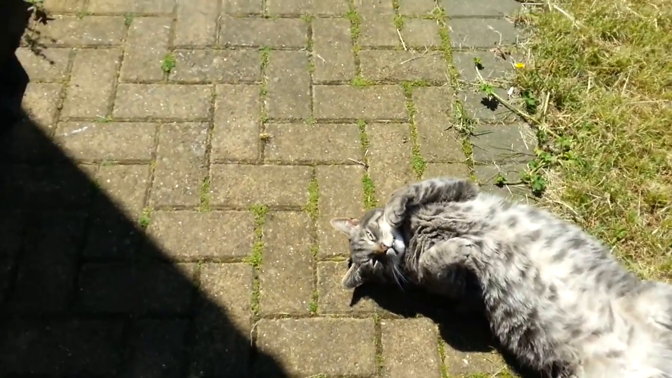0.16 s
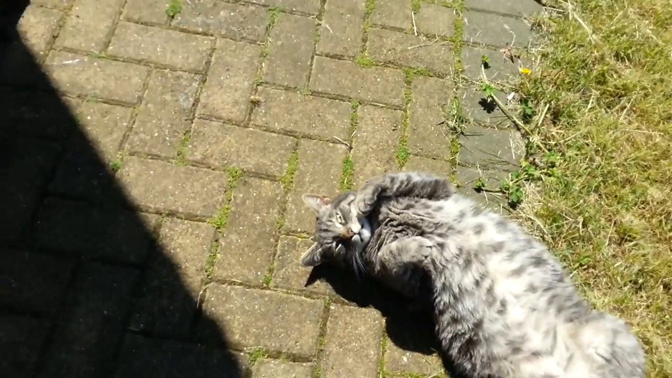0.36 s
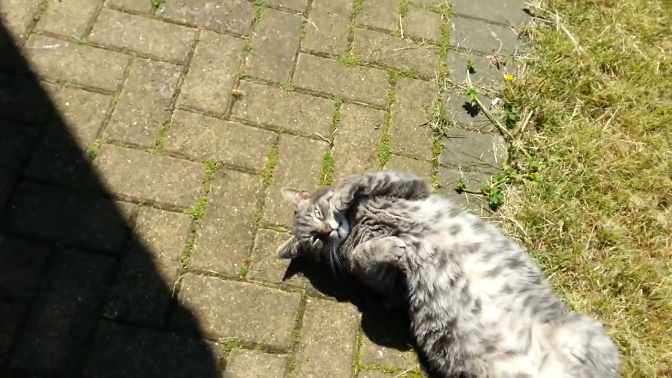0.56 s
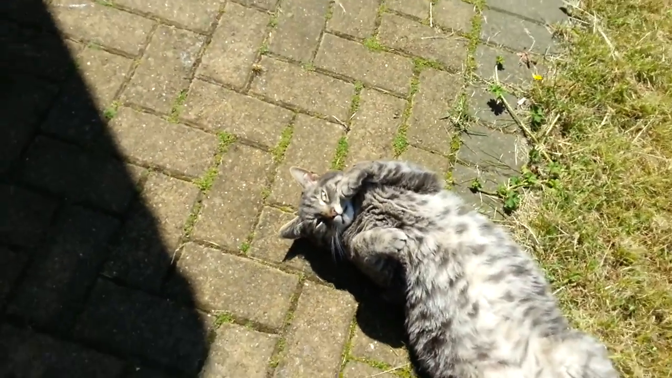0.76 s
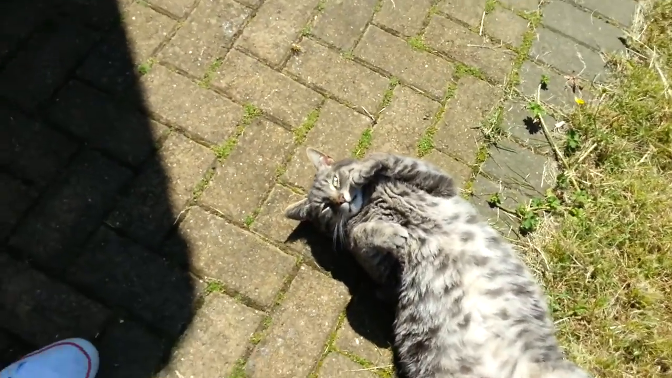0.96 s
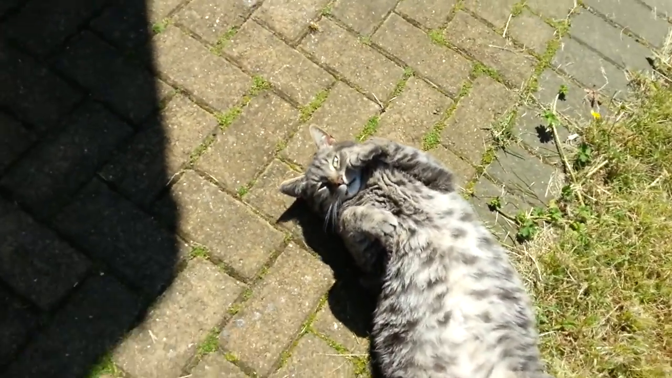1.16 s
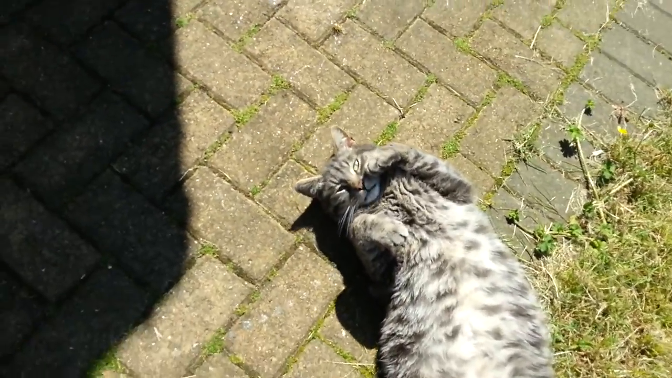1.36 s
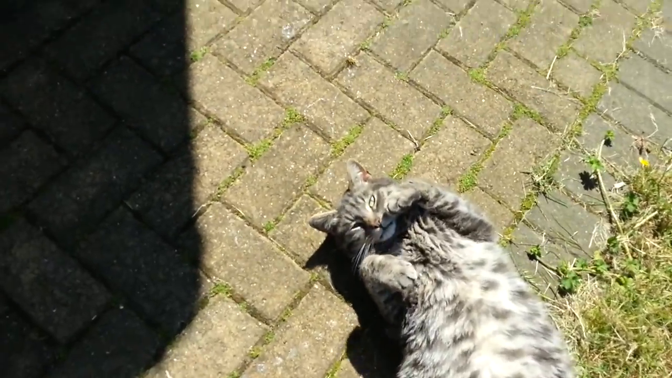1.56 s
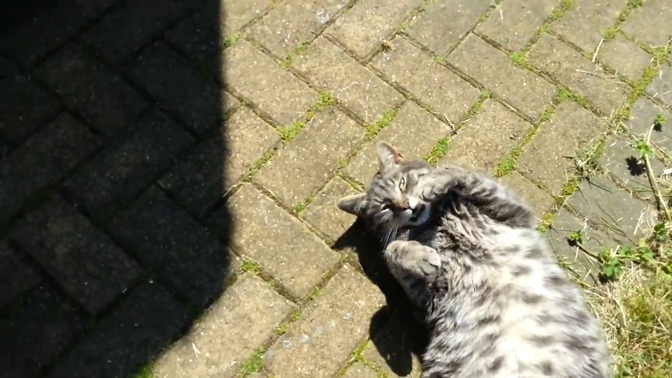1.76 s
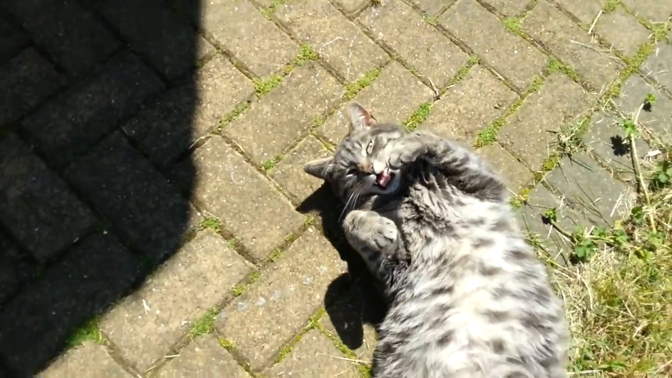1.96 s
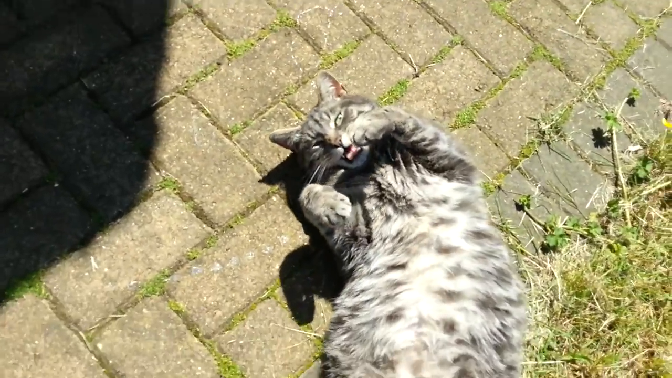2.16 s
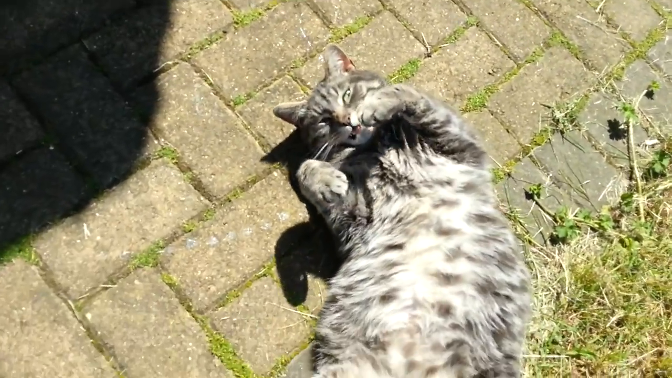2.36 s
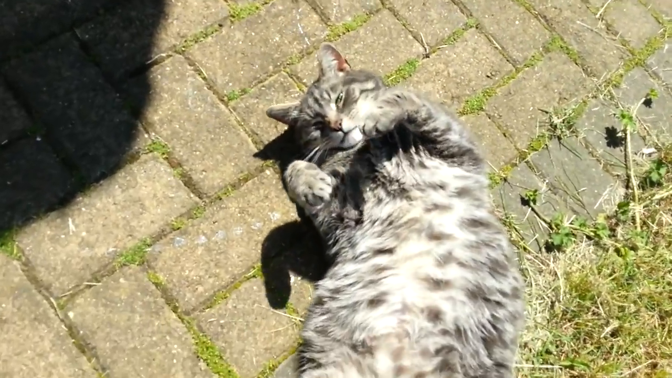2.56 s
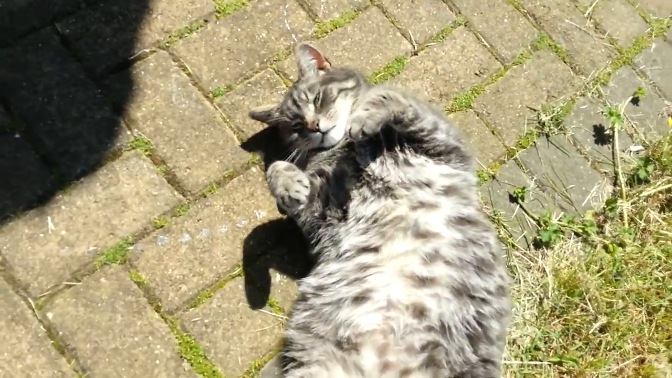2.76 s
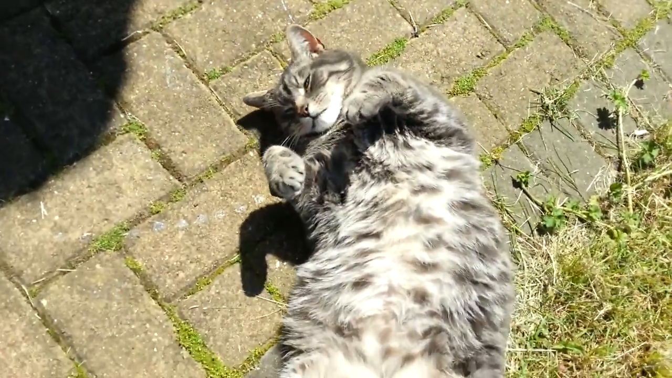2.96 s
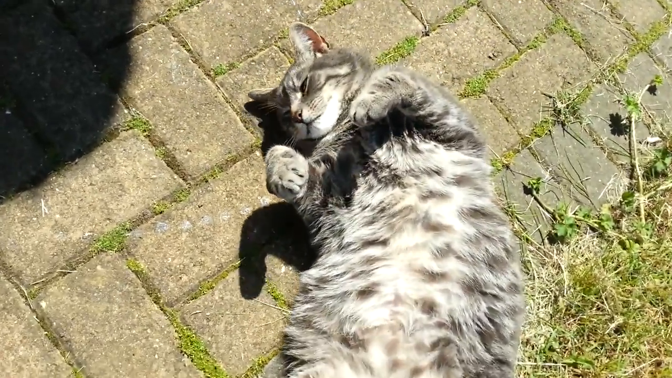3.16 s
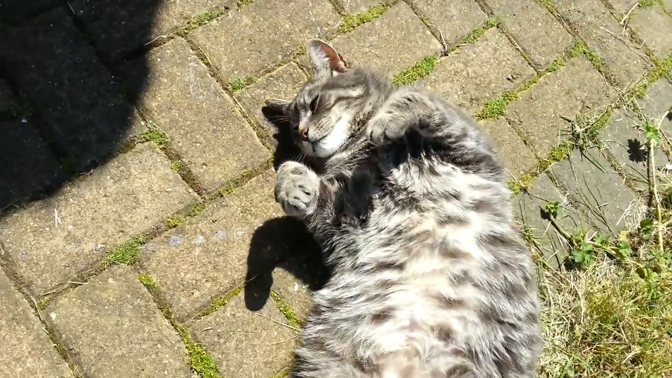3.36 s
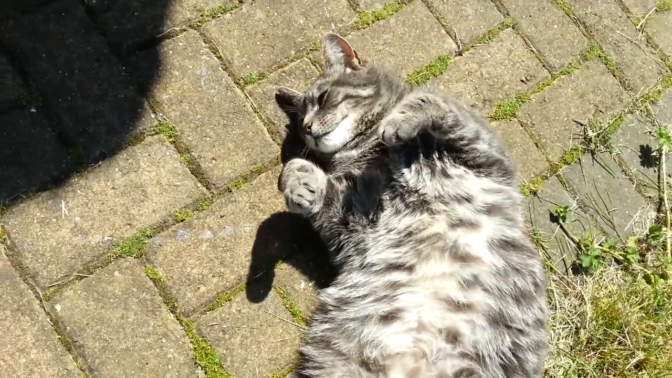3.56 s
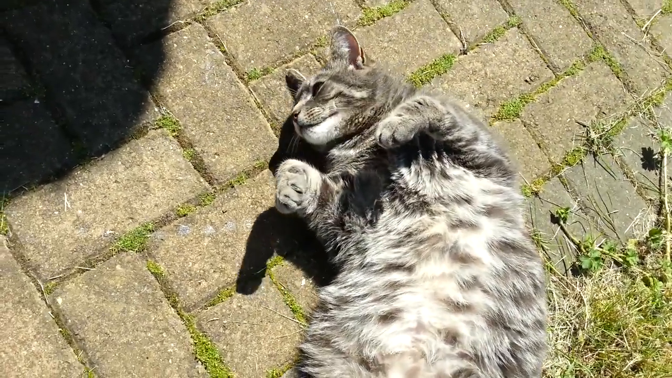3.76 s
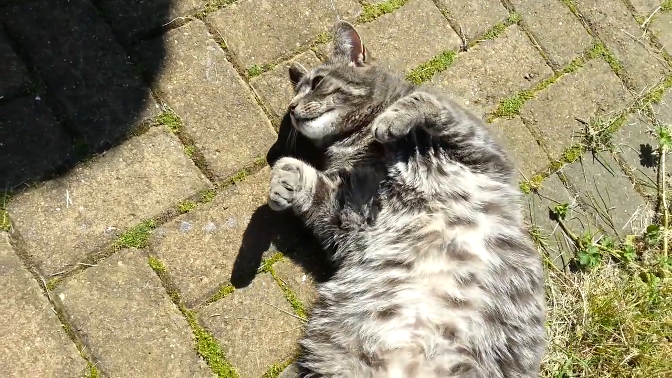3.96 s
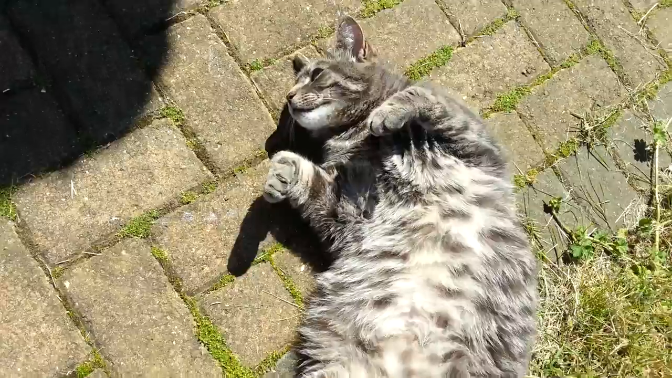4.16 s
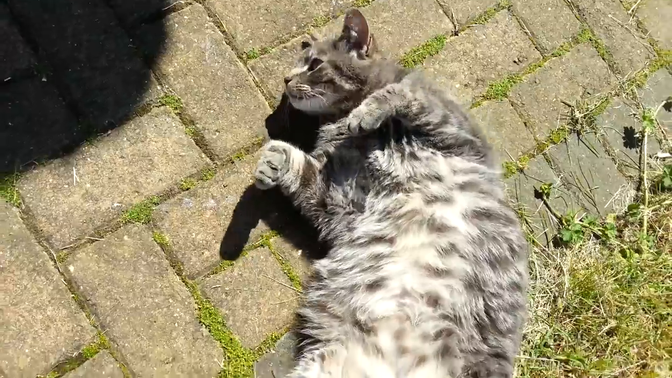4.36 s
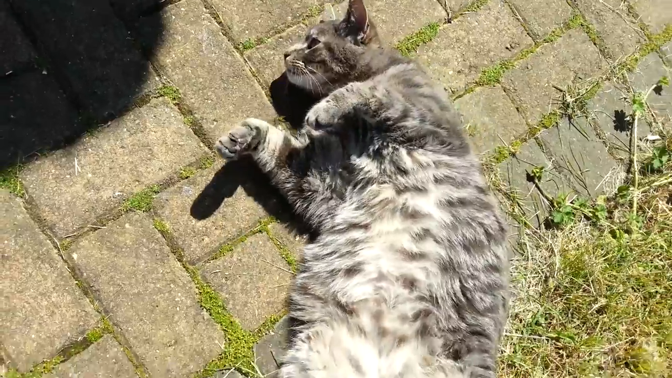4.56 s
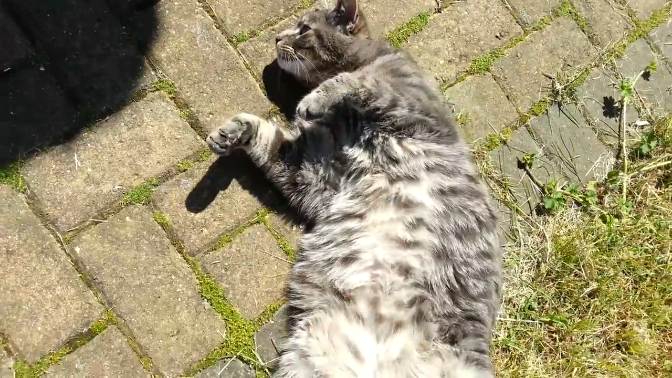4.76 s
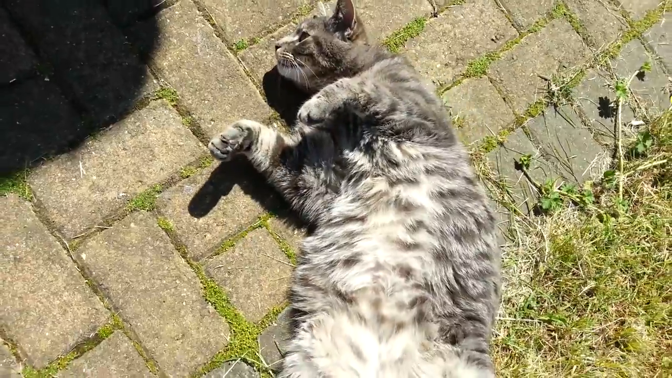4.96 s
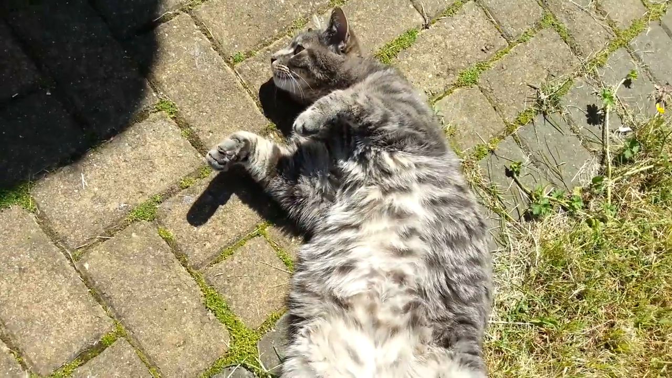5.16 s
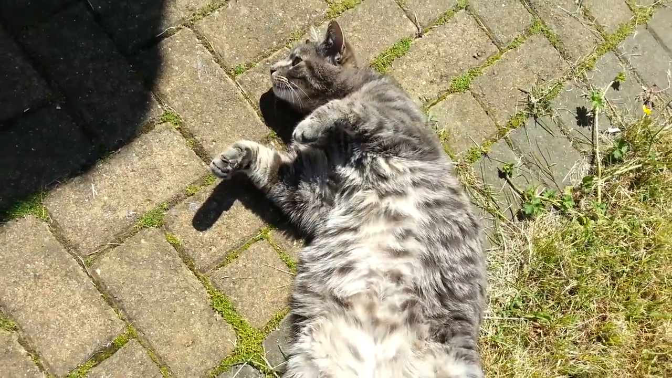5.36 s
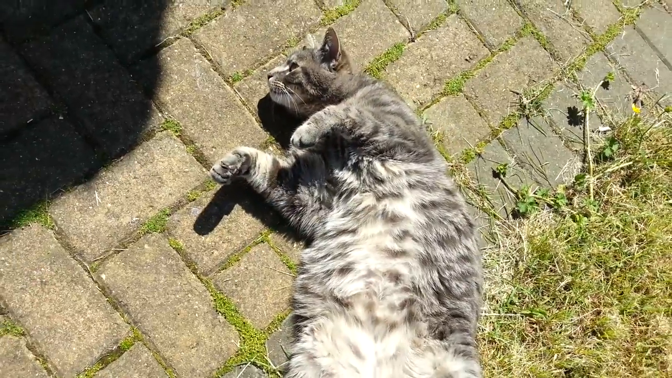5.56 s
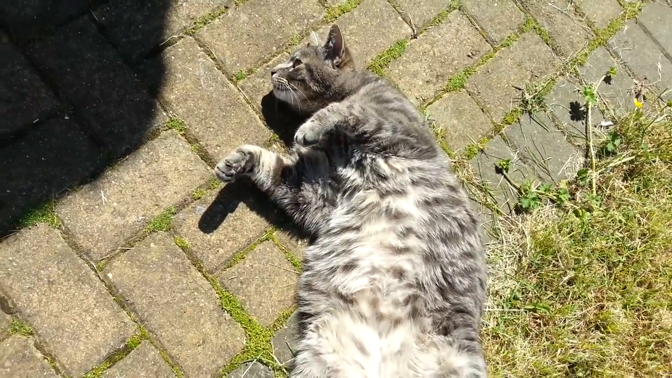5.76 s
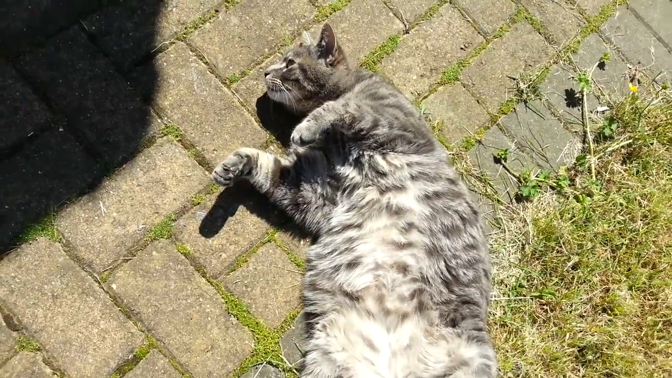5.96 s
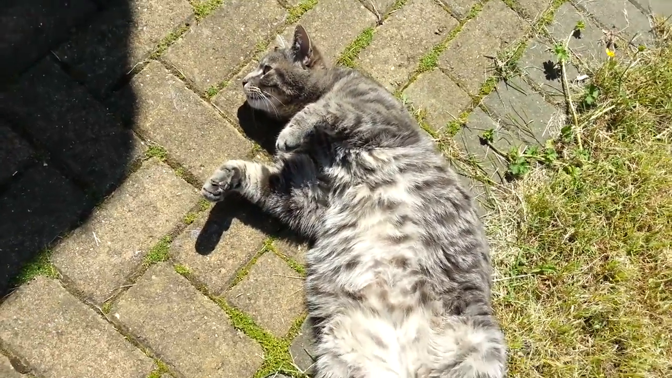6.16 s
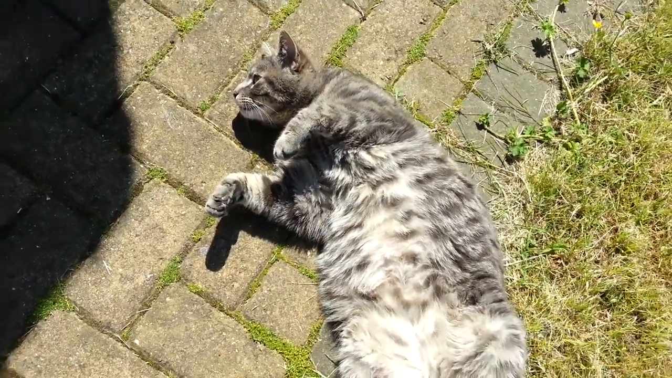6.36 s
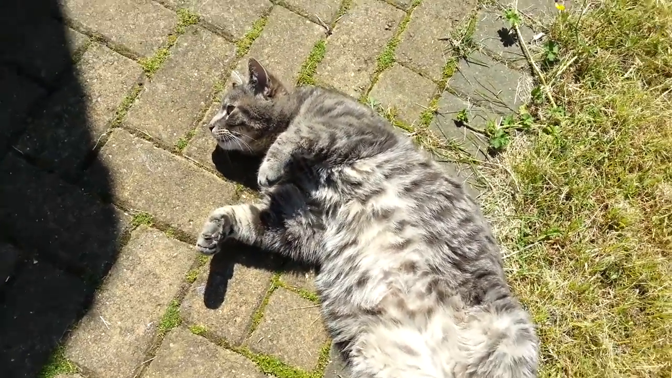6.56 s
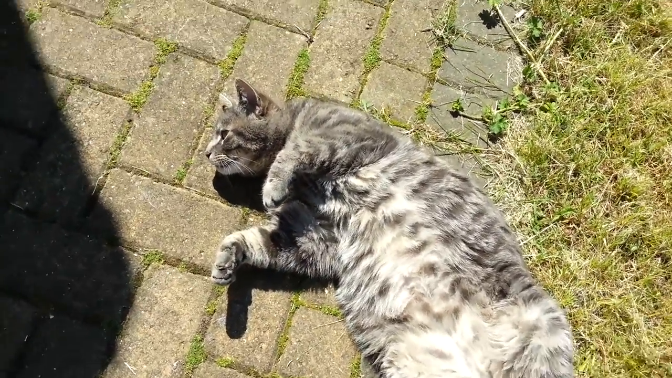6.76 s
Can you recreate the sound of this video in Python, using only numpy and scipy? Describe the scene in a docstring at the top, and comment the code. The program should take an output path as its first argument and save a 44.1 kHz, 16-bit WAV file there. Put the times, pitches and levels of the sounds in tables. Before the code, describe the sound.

Soft outdoor hiss and a very faint, wavering distant hum run through about seven seconds in a quiet garden. For the first second and a half, shoes scuff on paving and fingers rub and tap the hand-held microphone, with one sharp, loud tap on the left at 0.4 seconds. At 1.8 seconds a nearby cat trills once, fairly softly: a thin falling squeak, a brief creak, then a warbling mew that ends in a little sigh by 2.6 seconds. Two light taps come just after 3 seconds. At 4.2 seconds something like a door drags for an instant and slams, its quick blows merging into one loud thump that rings out for about half a second. More close taps and scuffs follow on the left from 5 to 5.4 seconds, then one short, hard knock near 6 seconds and a few faint ticks and rubs.

```python
"""Quiet outdoor air and a far-off hum run throughout. Shoes scuff; fingers rub and tap a hand-held camera.
At 1.8 s a cat rolling on garden paving trills once, vocal folds driving a closing throat: a thin squeak,
a creak, then a warbling mew that ends in a sigh. At 4.2 s something like a door drags, slams in four
quick blows and rings out. More taps and scuffs follow, with one hard knock on the casing near 6 s."""
import sys
import numpy as np
from scipy import signal
from scipy.fft import rfft, irfft
from scipy.io import wavfile
from scipy.ndimage import uniform_filter1d

SR = 44100
rng = np.random.default_rng(int(sys.argv[2]) if len(sys.argv) > 2 else 0)


def generate_wav(sig):
    """Save sig (samples, or channels by samples) to the path in sys.argv[1] as 16-bit PCM at SR."""
    pcm = np.round(np.clip(np.atleast_2d(sig).T, -1, 1) * 32767).astype(np.int16)
    wavfile.write(sys.argv[1], SR, pcm)


N = 300762
TIME, FREQS = np.arange(N) / SR, np.fft.rfftfreq(N, 1 / SR)
IN_TRILL = (TIME > 1.8) & (TIME < 2.7)


def gain_of(db):
    """Decibels to amplitude."""
    return 10 ** (np.asarray(db) / 20)


def unit_rms(x):
    """Scale to rms 1."""
    return x / np.sqrt(np.mean(x ** 2) + 1e-20)


def at_hz(table, hz):
    """Spectrum table interpolated over log frequency."""
    table_hz, value = np.transpose(table)
    return np.interp(np.log(hz + 1), np.log(table_hz + 1), value)


def curve(table, column):
    """Time table column at every sample."""
    rows = np.array(table)
    return np.interp(TIME, rows[:, 0], rows[:, column])


def envelope(table, column):
    """Level column as gain, softly gated to the table's span."""
    gate = uniform_filter1d(1.0 * (TIME > table[0][0]) * (TIME < table[-1][0]), size=200)
    return gain_of(curve(table, column)) * gate


def since(start_s):
    """Seconds since start_s, zero before."""
    return np.maximum(TIME - start_s, 0)


def add(mix, start_s, sound):
    """Mix a stereo sound in at start_s."""
    part = mix[:, max(round(start_s * SR), 0):][:, :sound.shape[1]]
    part += sound[:, :part.shape[1]]


def pan(side_db):
    """Left and right gains, mean 1."""
    left = gain_of(np.atleast_1d(side_db))
    return 2 * np.array([left, np.ones_like(left)]) / (1 + left)


def drift(cutoff_hz):
    """Low-passed noise, rms 1."""
    return unit_rms(irfft(rfft(rng.standard_normal(N)) * np.exp(-(FREQS / cutoff_hz) ** 2), N))


def resonate(x, hz, width_hz):
    """Four-stage unity-gain resonance following the curve hz."""
    carrier = np.exp(2j * np.pi * np.cumsum(hz) / SR)
    pole = np.exp(-np.pi * width_hz / SR)
    baseband = x / carrier + 1e-18
    for _ in range(4):
        baseband = signal.lfilter([1 - pole], [1, -pole], baseband)
    return 2 * (carrier * baseband).real


def noise_pair(spectrum, coherence, balance):
    """Coloured stereo noise; negative coherence counts as 0."""
    common, separate = rfft(rng.standard_normal((2, N)))
    alike = np.clip(at_hz(coherence, FREQS), 0, 1)
    pair = np.array([common, alike * common + np.sqrt(1 - alike ** 2) * separate])
    pair = irfft(pair * pan(at_hz(balance, FREQS)) * gain_of(at_hz(spectrum, FREQS)), N)
    return pair / np.std(pair.mean(0))


def outdoor_air(level_db=-52.5, swell_depth=0.19):
    """Steady hiss over soft air whose low end swells a little."""
    # air noise: (frequency [Hz], density [dB])
    spectrum = [(15, -63), (25, -16.5), (130, -4.5), (210, -1.5), (388, -8), (420, -3), (455, -12),
                (493, -8.5), (775, -10), (1130, -11.5), (2250, -16.5), (3100, -17.5), (4040, -14.5),
                (5410, -21.5), (14500, -22.5)]
    # channel likeness: (frequency [Hz], coherence [ratio])
    coherence = [(60, 0.33), (130, 0.5), (290, 0.43), (640, 0.25), (1410, -0.25), (3100, -0.3),
                 (6820, -0.95), (15000, -0.29)]
    # air balance: (frequency [Hz], left-right [dB])
    balance = [(60, 0), (110, 2.5), (200, 1), (380, -0.5), (700, -1.5), (1290, -3.5), (2380, -1.5),
               (4400, -6.5), (8120, -4.5), (15000, -4.5)]
    air = noise_pair(spectrum, coherence, balance) * gain_of(level_db)
    low = signal.sosfilt(signal.butter(1, 600, fs=SR, output="sos"), air)
    return air + swell_depth * drift(2.0) * low


def far_hum(pitch_hz=136, rest_db=-68.5):
    """A distant tone wavers in pitch and level and swells twice."""
    # hum swells: (peak time [s], half length [s], level [dB])
    swells = [(1.542, 0.37, -65), (5.15, .6, -62)]
    swell = sum(gain_of(db) * np.exp(-((TIME - s) / half_s) ** 4) for s, half_s, db in swells)
    tone = np.sqrt(2) * np.sin(2 * np.pi * np.cumsum(pitch_hz * (1 + 0.02 * drift(9.7))) / SR)
    return (gain_of(rest_db) + swell) * tone * gain_of(2 * drift(8.2))


def shuffles(scuffs_per_s=14, rise_s=0.07, fall_s=0.07, spread_db=1.5):
    """Rows for scuffs(): faint strokes scattered through each spell."""
    # shuffling spells: (start [s], end [s], level [dB], band centre [Hz], left-right [dB])
    spells = [(0.111, .34, -48.5, 840, 4.5), (.74, 1.02, -52, 960, -2), (5.098, 5.3, -50.5, 676, 17)]
    rows = []
    for start_s, end_s, db, hz, side_db in spells:
        for s in np.arange(start_s, end_s, 1 / scuffs_per_s):
            peak_s = s + rng.uniform(-0.6, 0.5) / scuffs_per_s
            rows.append((peak_s, rise_s, fall_s, db + spread_db * rng.standard_normal(), hz, side_db))
    return rows


def scuffs(grain_db=3.5, grains_per_s=800, hiss=0.14, fizz_db=-11, band_octaves=3.23):
    """Shoe and finger friction: dense grains swell and die in a band, with fizz above it."""
    # strokes: (peak time [s], rise [s], fall [s], level [dB], band centre [Hz], left-right [dB])
    strokes = [(.408, 0.08, 0.041, -38.5, 1700, -14), (.41, 0.028, 0.033, -35, 610, 28),
               (.41, 0.054, 0.089, -43, 9000, -15), (.475, 0.035, 0.05, -39.5, 1700, 3),
               (.499, 0.024, 0.05, -40.5, 286, -4), (.628, .03, 0.04, -38, 755, 6),
               (.652, 0.049, 0.033, -43.5, 1700, -29), (1.068, .066, 0.033, -43.5, 2040, 7.5),
               (1.385, .012, 0.028, -32.5, 1780, 2.5), (1.44, 0.028, 0.056, -46, 604, 11),
               (1.56, .014, 0.069, -45.5, 800, -4), (1.6, .06, 0.059, -41.5, 2010, 11),
               (5.318, 0.046, .015, -33.5, 800, 20), (5.335, 0.0079, 0.015, -25.5, 790, 29),
               (5.355, .018, 0.12, -45, 1040, -9), (5.782, 0.0075, 0.091, -44.5, 149, -4),
               (6.34, .008, 0.026, -46, 1640, -19), (6.714, .045, 0.047, -47, 1650, -16)]
    out, t = np.zeros((2, N)), TIME[:SR // 2]
    hz, shape = np.fft.rfftfreq(len(t), 1 / SR), (2, len(t))
    alike = 1 / (1 + (hz / 2200) ** 2)  # channels agree only on long waves
    for peak_s, rise_s, fall_s, db, centre_hz, side_db in list(strokes) + shuffles():
        low_hz, high_hz = centre_hz / 2 ** (band_octaves / 2), centre_hz * 2 ** (band_octaves / 2)
        sizes = gain_of(grain_db * np.minimum(rng.exponential(1, shape), 3))
        grains = rng.standard_normal(shape) * (hiss + sizes * (rng.random(shape) < grains_per_s / SR))
        band = 1 / (1 + (hz / high_hz) ** 6) + gain_of(fizz_db) / (1 + (hz / (4 * high_hz)) ** 2)
        band /= np.sqrt((1 + (low_hz / (hz + 1)) ** 4) * (1 + hz / 1500))
        common, separate = rfft(grains) * band
        pair = unit_rms(irfft(np.array([common, alike * common + np.sqrt(1 - alike ** 2) * separate])))
        start_s = max(peak_s - 2 * rise_s, 0)
        past_peak_s = t + start_s - peak_s
        distance = np.where(past_peak_s < 0, -past_peak_s / rise_s, past_peak_s / fall_s)
        swell = np.exp(-1.5 * distance ** 1.61) * np.minimum(t / 0.0029, 1)
        add(out, start_s, pan(side_db) * gain_of(db) * swell * pair)
    return out


def taps(snap_hz=2300, snap_s=0.00022, ring_cycles=0.41):
    """Fingers strike the camera body: a hollow thud of a few cycles plus a short snap."""
    # single taps: (time [s], level [dB], pitch [Hz], snap [0-1], left-right [dB])
    hits = [(.306, -27.5, 780, 0.13, -4), (.4149, -3.5, 760, 0.59, 30), (.48, -26, 320, .13, 4),
            (.596, -26, 686, .13, 5), (.834, -29.5, 418, 0.03, -4), (.928, -25.5, 810, .48, 22),
            (1.395, -21.5, 1410, 1, -5), (1.459, -23.5, 1300, 1, 22), (1.547, -29.5, 815, 0.2, -6),
            (3.072, -29.5, 1500, .95, 15), (3.1888, -25.5, 1100, .02, -13), (3.19, -24.5, 220, 0.3, -21),
            (5.03, -21, 447, 0.65, 25), (5.2286, -20, 540, 0.77, 29), (5.2387, -20.5, 1190, 1, 23),
            (5.312, -16.5, 500, .74, 25), (5.3378, -20, 603, 0.85, 22), (5.343, -14, 224, 0.15, 31),
            (6.336, -30, 1400, 0.1, -15), (6.681, -28.5, 770, .02, -8)]
    out, t = np.zeros((2, N)), TIME[:1500]
    crack = np.exp(-t / snap_s) * np.sin(2 * np.pi * snap_hz * t)
    for s, db, hz, snap, side_db in list(hits) + slips():
        age = hz * t / ring_cycles
        thud = age ** 2 * np.exp(-2 * age) * np.cos(2 * np.pi * hz * t)
        tap = (1 - snap) * thud / abs(thud).max() + snap * crack / crack.max()
        add(out, s, pan(side_db) * gain_of(db) * tap)
    return out


def slips(jitter_s=0.00056, spread_db=1):
    """Rows for taps(): a finger sticks and slips at a nearly even rate."""
    # runs: (start [s], length [s], rate [1/s], level [dB], pitch [Hz], snap [0-1], left-right [dB])
    runs = [(0.4147, .035, 72, -21, 960, 0.8, 22), (5.044, .1, 31.5, -25, 520, .72, 21),
            (6.421, .05, 56, -36, 242, 0.2, -35), (6.532, .085, 42, -37.5, 254, .05, -31)]
    return [(s + jitter_s * rng.standard_normal(), db + spread_db * rng.standard_normal(), hz, snap, side)
            for start_s, length_s, slips_per_s, db, hz, snap, side in runs
            for s in np.arange(start_s, start_s + length_s, 1 / slips_per_s)]


def camera_body(x, level_db=-3, low_cut_hz=90):
    """The hollow body rings briefly with nearby sounds and passes little bass."""
    # body resonances: (frequency [Hz], width [Hz], gain [dB])
    resonances = [(374, 400, -3.5), (1640, 330, -7.5), (4240, 1160, -2.5)]
    ring = sum(gain_of(db) * signal.lfilter(*signal.iirpeak(hz, hz / width_hz, SR), x)
               for hz, width_hz, db in resonances)
    highpass = signal.butter(2, low_cut_hz, "high", fs=SR, output="sos")
    return gain_of(level_db) * signal.sosfilt(highpass, x + ring)


def folds(hz, tilt_db_per_octave, even_db, partials):
    """Vocal pulse train; a symmetric swing weakens the even partials."""
    cycles = np.cumsum(hz[IN_TRILL]) / SR
    out = np.zeros(N)
    for k in range(1, partials + 1):
        db = tilt_db_per_octave[IN_TRILL] * np.log2(k) + even_db * (k % 2 == 0)
        out[IN_TRILL] += gain_of(db) * np.cos(2 * np.pi * k * cycles)
    return out


def throat(drive, rms, open_s=1.855, shut_s=2.483):
    """Formants slide and darken as the jaw shuts, slowly then fast; the level follows rms."""
    # formants: (shut [Hz], open [Hz], width [Hz], shut gain [dB], open gain [dB])
    formants = [(553, 430, 680, 1.5, -11), (980, 1156, 1130, -13, 2.5), (1100, 1934, 990, 17.5, 6.5),
                (2940, 3510, 1330, -11.5, 1), (5960, 5450, 720, -2.5, -1), (8110, 6400, 5800, -46, -17)]
    opening = 1 - np.minimum(since(open_s)[IN_TRILL] / (shut_s - open_s), 1) ** 3.96
    voice, out = 0, np.zeros(N)
    for k, (shut_hz, open_hz, width_hz, shut_db, open_db) in enumerate(formants):
        hz = shut_hz + (open_hz - shut_hz) * opening
        db = shut_db + (open_db - shut_db) * opening
        voice += (-1) ** k * gain_of(db) * resonate(drive[IN_TRILL], hz, width_hz)
    out[IN_TRILL] = voice / np.sqrt(abs(uniform_filter1d(voice ** 2, size=700)) + 1e-14)
    return out * rms


def squeak(throb_hz=22.3, throb_db=7.5, throb_fade_s=0.067):
    """The folds whistle thinly, throbbing at first and brightening as the pitch drops."""
    # squeak contour: (time [s], pitch [Hz], level [dB])
    contour = [(1.826, 1318, -46), (1.828, 1324, -48), (1.888, 1316, -41.5), (1.946, 1081, -37),
               (1.968, 938, -38)]
    start_s = contour[0][0]
    age_s = since(start_s)
    throb = np.exp(-age_s / throb_fade_s) * np.cos(2 * np.pi * throb_hz * since(start_s + 0.0043))
    hz = curve(contour, column=1) * (1 + 0.0089 * drift(125))
    pulses = folds(hz, tilt_db_per_octave=np.minimum(-11.5 + 70 * age_s, 0), even_db=-7, partials=6)
    return throat(pulses, envelope(contour, column=2) * gain_of(throb_db * throb))


def creak(puff_s=0.001):
    """The folds slap unevenly, each slap with a puff of air."""
    # creak contour: (time [s], slap rate [1/s], level [dB])
    contour = [(1.935, 315, -43), (1.966, 278, -40.5), (1.992, 153, -42.5), (2.03, 225, -34.5),
               (2.06, 207, -37.5), (2.09, 180, -63)]
    cycles = np.cumsum(curve(contour, column=1) * np.exp(0.16 * drift(200))) / SR
    slaps = np.diff(np.floor(cycles), prepend=0) * np.exp(0.15 * drift(200))
    puffs = signal.lfilter([1], [1, -np.exp(-1 / (puff_s * SR))], slaps) * rng.standard_normal(N)
    return throat(slaps + 0.15 * puffs, envelope(contour, column=2))


def breath(rise_s=0.0068, sag_db_per_s=35, release_s=0.022):
    """Air through the throat: one puff under the creak, one as the closing sigh."""
    # air puffs: (start [s], length [s], level [dB])
    puffs = [(1.96, 0.13, -39), (2.444, 0.18, -42)]
    flow = np.zeros(N)
    for start_s, length_s, db in puffs:
        age_s = since(start_s)
        gate = (1 - np.exp(-age_s / rise_s)) * np.exp(-since(start_s + length_s) / release_s)
        flow += gain_of(db - sag_db_per_s * age_s) * gate
    air = signal.sosfilt(signal.butter(1, 2500, fs=SR, output="sos"), rng.standard_normal(N))
    return throat(air, flow)


def mew(flutter_hz=92, steady_hz=610, slack_hz=510, settle_s=0.035, relax_s=2.33, hoarse_db=-17):
    """Slightly hoarse folds flutter as they settle and whenever the pitch goes slack."""
    # mew contour: (time [s], pitch [Hz], level [dB])
    contour = [(2.062, 599, -33), (2.092, 501, -33.5), (2.17, 567.5, -29.5), (2.182, 507.7, -35),
               (2.212, 500, -32.5), (2.234, 521.5, -33), (2.244, 504.4, -33.5), (2.3, 558.3, -28),
               (2.32, 531.6, -30), (2.346, 532.5, -26.5), (2.372, 579.3, -29.5), (2.455, 583, -33.5)]
    pitch_hz = curve(contour, column=1)
    slack = np.clip((steady_hz - pitch_hz) / (steady_hz - slack_hz), 0, 1)
    depth = np.maximum(slack, np.exp(-since(contour[0][0]) / settle_s))
    flutter = depth * np.sin(2 * np.pi * np.cumsum(flutter_hz * (1 + 0.148 * drift(40.3))) / SR)
    hz = pitch_hz * (1 + 0.017 * flutter + 0.0059 * drift(202))
    tilt_db_per_octave = 0.5 - 12 * np.minimum(since(relax_s), 0.2)  # relaxing folds dull the tone
    pulses = folds(hz, tilt_db_per_octave, even_db=-2.5, partials=11)
    # air leaks with each pulse, rising in the treble
    leak = gain_of(hoarse_db) * np.diff(rng.standard_normal(N + 1)) * SR / (2 * np.pi * 2000)
    return throat(pulses * (1 + leak), envelope(contour, column=2)) * (1 + 0.09 * flutter)


def cat():
    """The whole trill, its treble mostly on the left."""
    # cat balance: (frequency [Hz], left-right [dB])
    balance = [(300, -24), (700, 8.5), (1300, -11.5), (2400, 9), (4400, 32), (6000, 34), (9000, 3)]
    trill = squeak() + creak() + breath() + mew()
    return irfft(rfft(trill) * pan(at_hz(balance, FREQS)), N)


def garden(x, wet_db=-15, t60_s=0.18):
    """Faint scattered echoes from walls and fences."""
    t = TIME[:SR // 2]
    echoes = rng.standard_normal((2, len(t))) * (rng.random((2, len(t))) < 0.05)
    echoes *= gain_of(-60 * t / t60_s) * (t > 0.006)
    return x + gain_of(wet_db) * signal.fftconvolve(x, echoes / np.linalg.norm(echoes[0]), axes=1)[:, :N]


def slam(ring_db=5, ring_rise_s=0.0078, left_lag_s=0.00008):
    """A panel drags, then strikes home in quick blows; the surroundings ring on."""
    # drag before shutting: (time [s], level [dB])
    drag_levels = [(4.214, -46), (4.224, -31), (4.241, -29), (4.251, -27), (4.262, -23)]
    # drag noise: (frequency [Hz], density [dB])
    drag_spectrum = [(50, -22), (200, -7.5), (420, -4), (900, -19), (2500, -22), (6500, -30), (7400, -27),
                     (7900, -14.5), (8500, -27), (12000, -52)]
    # impacts: (time [s], level [dB], rise [s], decay time [factor])
    blows = [(4.2567, -12, 0.0016, 0.29), (4.263, -4, 0.0015, 0.13), (4.278, -10, 0.0034, 0.99),
             (4.314, -16, 0.0046, 0.81)]
    # impact noise: (frequency [Hz], density [dB])
    blow_spectrum = [(21, -53), (35, -30), (66, -7), (103, -7), (174, -6), (208, 0.5), (310, -5),
                     (440, -6.5), (487, -4), (552, -10), (1030, -6), (1620, -10.5), (2300, -10),
                     (6770, -28), (14000, -56)]
    # ring-out: (frequency [Hz], t60 [s])
    decay = [(60, 0.58), (250, 0.59), (1000, 0.6), (2500, 0.55), (6000, 0.59), (11000, 0.43)]
    # ringing tones in the slam's echo: (frequency [Hz], level [dB])
    echo_tones = [(131.2, -39), (182.4, -33), (203.9, -36), (249.0, -35), (283.3, -36), (304.8, -36),
                  (363.4, -34), (396.3, -39), (417.9, -40), (442.1, -39), (476.4, -38), (518.1, -39),
                  (721.4, -39), (758.4, -39), (802.1, -40), (835.1, -38), (886.9, -39), (1018.1, -36),
                  (1053.8, -39), (1248.3, -37), (1393.6, -40), (1554.4, -42), (1764.4, -41), (2006.6, -41),
                  (2035.6, -43), (2082.0, -42), (2230.7, -42), (2273.1, -39)]
    # channel likeness: (frequency [Hz], coherence [ratio])
    coherence = [(60, 0.49), (130, 1), (290, 0.94), (640, 1), (1410, 0.83), (3100, 0.14), (6820, 0.0),
                 (15000, 0)]
    # slam balance: (frequency [Hz], left-right [dB])
    balance = [(60, -2), (110, -4.5), (200, -1), (380, -1.5), (700, -1.5), (1290, 2), (2380, 13.5),
               (4400, 18.0), (8120, 24), (15000, -21)]
    out = noise_pair(drag_spectrum, coherence, balance) * envelope(drag_levels, column=1)
    t = TIME[:SR]
    bursts = noise_pair(blow_spectrum, coherence, balance)[:, :len(blows) * SR].reshape(2, -1, SR)
    bin_hz, age_s, spectra = signal.stft(bursts, SR, nperseg=512)
    diffuse_db = -1 - 3 / (1 + (bin_hz[:, None] / 700) ** 2)  # bass dips under the ringing tones
    for k, (s, db, rise_s, stretch) in enumerate(blows):
        t60_s = stretch * at_hz(decay, bin_hz)[:, None]
        tail = signal.istft(spectra[:, k] * gain_of(diffuse_db - 60 * age_s / t60_s), SR)[1][:, :SR]
        add(out, s, gain_of(db) * tail * (1 - np.exp(-t / rise_s)))
    for hz, db in echo_tones:
        level = 2 * gain_of(db + ring_db - 60 * t / at_hz(decay, hz)) * (1 - np.exp(-t / ring_rise_s))
        tone = level * np.sin(2 * np.pi * (hz * t + rng.random()))
        add(out, blows[1][0], pan(at_hz(balance, hz)) * tone)
    left = irfft(rfft(out[0]) * np.exp(-2j * np.pi * FREQS * left_lag_s), N)
    return np.array([left, out[1]])


def knock(start_s=5.9562, low_cut_hz=260):
    """One hard knock rings the hollow casing for milliseconds, without bass."""
    # casing modes: (frequency [Hz], level [dB], t60 [s], left-right [dB])
    modes = [(500, -15.5, 0.012, -4), (1320, -23, 0.022, 0), (1700, -8.5, 0.0062, -18),
             (2800, -12.5, .0035, -31), (3900, -23.5, 0.0087, -23), (7700, -32, 0.0017, -14)]
    out, t = np.zeros((2, N)), TIME[:SR // 20]
    for hz, db, t60_s, side_db in modes:
        add(out, start_s, pan(side_db) * gain_of(db - 60 * t / t60_s) * np.sin(2 * np.pi * hz * t))
    return signal.sosfilt(signal.butter(2, low_cut_hz, "high", fs=SR, output="sos"), out)


def scene():
    """Stereo sum of all sources."""
    return garden(cat()) + slam() + camera_body(taps() + scuffs()) + knock() + outdoor_air() + far_hum()


def record(dry):
    """Rumble filter, full-scale clipping, band limit."""
    rumble_hz, edge_hz = 48, 14730
    lean = irfft(rfft(dry) / np.sqrt(1 + (rumble_hz / (FREQS + 1)) ** 6), N)
    lowpass = signal.firwin(511, edge_hz, window=("kaiser", 9), fs=SR)
    return signal.oaconvolve(np.clip(lean, -1, 1), lowpass[None], "same", axes=1)


dry = scene()
out = record(dry)
generate_wav(out)
```